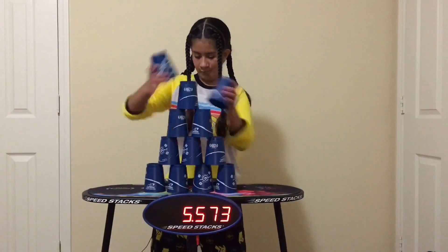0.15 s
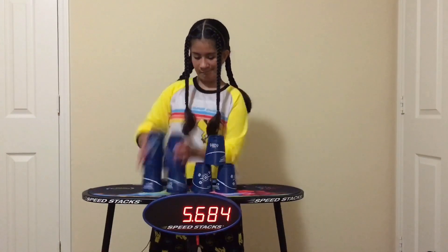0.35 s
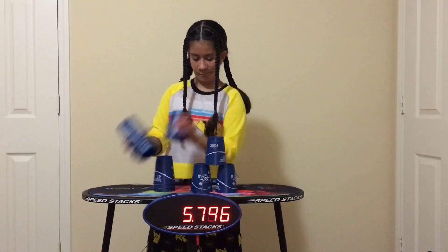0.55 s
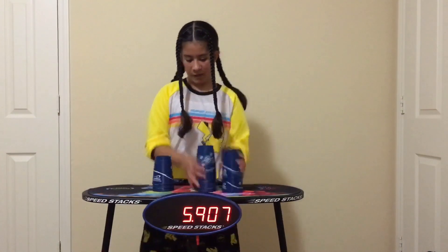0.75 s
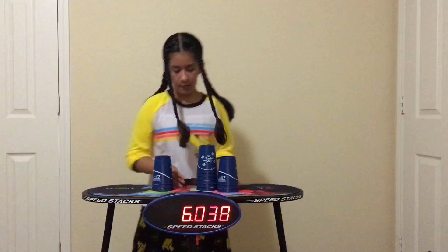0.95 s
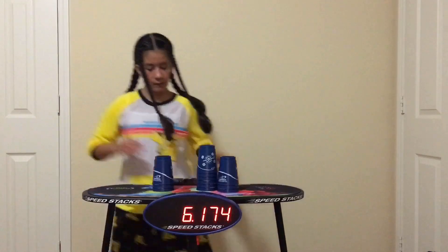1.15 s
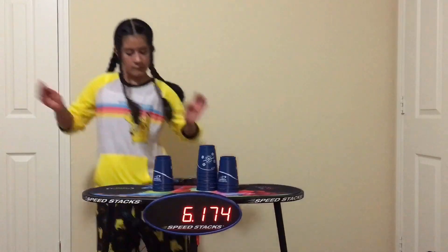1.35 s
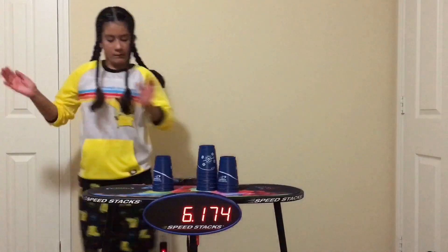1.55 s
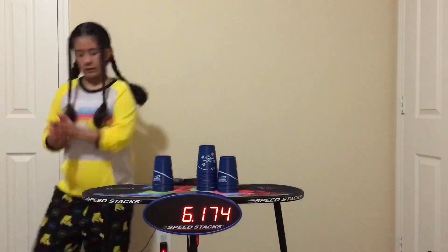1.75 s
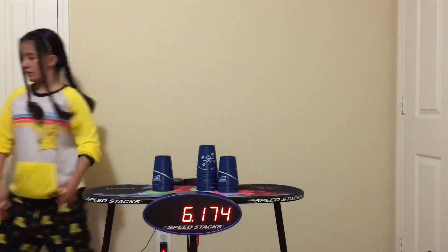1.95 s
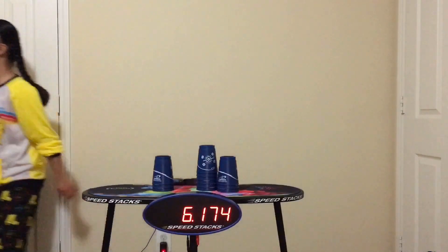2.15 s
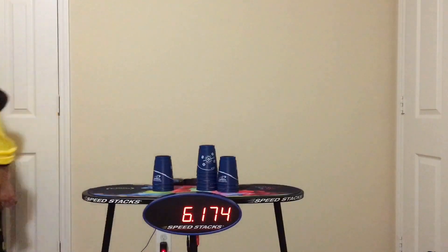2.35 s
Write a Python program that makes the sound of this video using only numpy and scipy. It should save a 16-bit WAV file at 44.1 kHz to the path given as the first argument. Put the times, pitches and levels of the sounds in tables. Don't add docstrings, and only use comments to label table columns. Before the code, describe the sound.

Fast hollow clatter of plastic cups in two short bursts, followed by a single echoing handclap

```python
import sys
import numpy as np
from scipy import signal
from scipy.fft import rfft, irfft, next_fast_len
from scipy.io import wavfile
from scipy.ndimage import uniform_filter1d

SR = 44100
rng = np.random.default_rng(int(sys.argv[2]) if len(sys.argv) > 2 else 0)


def master_out(mix):
    frames = np.transpose(np.atleast_2d(mix))
    ceiling = np.clip(frames, -1, 1)
    pcm = np.round(ceiling * 32767).astype(np.int16)
    wavfile.write(sys.argv[1], SR, pcm)


def gain_from_decibels(decibels):
    exponent = np.asarray(decibels, float) / 20
    return 10 ** exponent


N = 105840


def unit(x):
    return x / np.sqrt(np.mean(x ** 2) + 1e-20)


def along(points, hz):
    f, v = np.transpose(points)
    return np.interp(np.log(hz + 1), np.log(f + 1), v)


def gain_curve(rows):
    s, db = np.transpose(rows)
    return gain_from_decibels(np.interp(np.arange(N) / SR, s, db, left=-200, right=-200))


def filtered(x, response):
    m = next_fast_len(N + SR // 2)
    return irfft(rfft(x, m) * response(np.fft.rfftfreq(m, 1 / SR)), m)[:N]


def coloured(x, spectrum):
    cepstrum = irfft(np.log(gain_from_decibels(along(spectrum, np.fft.rfftfreq(4096, 1 / SR))) + 1e-6))
    cepstrum[1:2048] *= 2
    cepstrum[2049:] = 0
    h = irfft(np.exp(rfft(cepstrum)))
    return signal.fftconvolve(x, h / np.linalg.norm(h))[:N]


def resonant(x, peaks):
    def response(f):
        total = 0
        for k, (centre, width, db) in enumerate(peaks):
            total = total + (-1) ** k * gain_from_decibels(db) * 1j * f * width / (centre ** 2 - f * f + 1j * f * width)
        return total
    return filtered(x, response)


def room(x, t60s, stretch=1):
    out, step = np.zeros(N + 2 * SR), SR // 10
    for a in range(0, N, step):
        block = x[a:a + step]
        hz, t, z = signal.stft(rng.standard_normal(SR * 3 // 2), SR, nperseg=256)
        if np.any(block ** 2 > 1e-10):
            decay = gain_from_decibels(-60 * t / (stretch * along(t60s, hz)[:, None]))
            tail = signal.istft(z * decay, SR, nperseg=256)[1]
            y = signal.fftconvolve(block, tail / np.linalg.norm(tail))
            out[a + 50:][:len(y)] += y
    return out[:N]


# (frequency [Hz], level [dB])
HUSH_SPECTRUM = [(15, -45), (25, -20), (59, -7.5), (140, -16), (164, -11.5), (482, -22), (523, -29),
                 (598, -23), (15500, -42.5)]


def hush():
    return gain_from_decibels(-65.5) * coloured(rng.standard_normal(N), HUSH_SPECTRUM)


# (frequency [Hz], level [dB])
HUM_SPECTRUM = [(25, -13.5), (60, -4), (200, -23), (400, -5.5), (840, -2), (1500, -22.5), (4000, -23),
                (11000, -47)]


def hum():
    return gain_from_decibels(-54.5) * coloured(rng.standard_normal(N), HUM_SPECTRUM)


# (frequency [Hz], level [dB])
EARLIER_SPECTRUM = [(60, -16), (175, -3.5), (288, -10), (600, -8), (750, 3), (950, -13.5), (1500, -27),
                    (2100, -17.5), (11000, -39.5)]


def earlier_knocks():
    start_db, fall_db_per_s = -47.5, -49.5
    fall = gain_from_decibels(start_db + fall_db_per_s * np.arange(N) / SR)
    return fall * coloured(rng.standard_normal(N), EARLIER_SPECTRUM)


# (frequency [Hz], width [Hz], level [dB])
LENS_PEAKS = [(6460, 700, 5), (8800, 2800, -9)]
# (time [s], level [dB])
TICK_DRIFT = [
    (1.59, 0),
    (2.06, 4),
    (2.14, 0.5),
    (2.4, -2),
]


def lens_motor():
    start_s, gap_s, echo_s, t60_s, tick_db = 1.5995, .04995, .004, .006, -54
    x, t = np.zeros(N + SR), np.arange(SR // 100) / SR
    for s in np.arange(start_s, N / SR, gap_s):
        for lag_s in (0, echo_s):
            level = gain_from_decibels(tick_db + rng.normal(0, 1) - 60 * t / t60_s)
            x[round((s + lag_s) * SR):][:len(t)] += level * rng.standard_normal(len(t))
    return resonant(x[:N] * gain_curve(TICK_DRIFT), LENS_PEAKS)


# (time [s], level [dB])
RUSTLE_LEVEL = [
    (1.575, -64),
    (1.6, -59),
    (1.65, -58),
    (1.68, -62.5),
    (1.75, -59),
]
# (frequency [Hz], level [dB])
CLOTH_SPECTRUM = [(120, -34), (200, -24), (400, -7), (900, -0.5), (1200, -0.5), (1510, 1.5), (1950, -2.5),
                  (2400, -7.5), (15000, -33)]


def cloth():
    flutter = gain_from_decibels(1.2 * unit(uniform_filter1d(rng.standard_normal(N), 300)))
    friction = coloured(unit(flutter * rng.standard_normal(N)), CLOTH_SPECTRUM)
    return gain_from_decibels(2.5) * uniform_filter1d(gain_curve(RUSTLE_LEVEL), 900) * friction


# (delay [s], level [dB])
WALL_ECHOES = [
    (.0046, 1.5),
    (.016, -12),
    (.025, -11),
]


def walls(x):
    corner_hz = 6034
    echoes = sum(gain_from_decibels(db) * np.pad(x, (round(s * SR), 0))[:N] for s, db in WALL_ECHOES)
    return x + filtered(echoes, lambda hz: 1 / (1 + 1j * hz / corner_hz))


# (frequency [Hz], level [dB])
PALM_SPECTRUM = [(100, -14), (1200, -9), (2400, -6), (3100, -6.5), (4600, -5), (5200, -13.5), (9000, -16),
                 (10500, -24.5), (12000, -20), (16000, -22)]
# (frequency [Hz], width [Hz], level [dB])
PALM_AIR = [(2440, 990, -6), (3765, 650, 4), (4317, 590, -4.5)]
# (frequency [Hz], t60 [s])
CLAP_DECAY = [(150, 0.27), (400, 0.38), (1500, 0.46), (2700, 0.38), (3200, 0.63), (4600, 0.48),
              (5300, 0.46), (12000, 0.26)]
# (frequency [Hz], t60 [s])
CLAP_LATE_DECAY = [(600, 0.46), (1400, 1.65), (2700, 0.59), (3300, 1.06), (4500, 0.94), (5200, 0.55)]


def clap():
    clap_s, clap_db, brush_s, brush_db = 1.7633, -2.5, 0.0031, -37
    slap_db, pop_db, near_db, room_db, late_db = -4.5, 7, 3.5, 4.5, -12.5
    x, i, lead = np.zeros(N), round(clap_s * SR), round(brush_s * SR)
    x[i - lead:i] = gain_from_decibels(brush_db) * rng.standard_normal(lead) * np.linspace(0, 1, lead) ** 2
    x[i] = gain_from_decibels(clap_db)
    x = coloured(x, PALM_SPECTRUM)
    pop = gain_from_decibels(slap_db) * x + gain_from_decibels(pop_db) * resonant(x, PALM_AIR)
    near = gain_from_decibels(near_db) * room(x, CLAP_DECAY, 0.18)
    diffuse = gain_from_decibels(room_db) * room(x, CLAP_DECAY)
    late = gain_from_decibels(late_db) * room(pop, CLAP_LATE_DECAY)
    return walls(pop) + near + diffuse + late


def second_take():
    return clap() + cloth() + lens_motor() + hush()


def chatter(size):
    swing_db, swing_s = 3, .004
    width = round(swing_s * SR)
    smooth = uniform_filter1d(uniform_filter1d(rng.standard_normal(size), width), width)
    return gain_from_decibels(swing_db * unit(smooth))


def dying_notes(rows, swell_s):
    x, t = np.zeros(N), np.arange(SR // 2) / SR
    for s, db, hz, t60_s in rows:
        envelope = gain_from_decibels(db - 60 * t / t60_s) * (1 - np.exp(-t / swell_s)) * chatter(len(t))
        x[round(s * SR):][:len(t)] += envelope * np.sin(2 * np.pi * hz * t)
    return x


# (time [s], level [dB], frequency [Hz], t60 [s])
NEST_NOTES = [(.245, -20.5, 381, 0.11), (.317, -15, 520, 0.077), (.322, -13.5, 365, 0.081),
              (.346, -11.5, 385, 0.087), (.3768, -15, 367, 0.072), (.362, -15, 420, 0.051),
              (.384, -13.5, 348.4, 0.068), (.41, -11.5, 367.7, .08), (.42, -11.5, 418.4, .07),
              (.44, -30, 236, .3), (.446, -16.5, 256, 0.074), (.452, -12.5, 398, .1),
              (.465, -16.5, 380, 0.061), (.774, -12, 320, 0.031), (.785, -8, 318, 0.13),
              (.809, -9.5, 329, 0.095), (.82, -12, 447, 0.028), (.831, -17.5, 520, 0.08)]


def nest_columns():
    return dying_notes(NEST_NOTES, swell_s=0.0014)


# (time [s], level [dB], frequency [Hz], t60 [s])
RIM_NOTES = [(.2435, -17.5, 783, 0.11), (.2435, -25, 2120, .05), (.249, -24.5, 1980, 0.04),
             (.27, -23.5, 758, 0.067), (.272, -25.5, 3480, 0.1), (.284, -25.5, 1980, 0.032),
             (.2995, -19, 2020, 0.046), (.3152, -15, 2006, .06), (.3152, -17.5, 1520, 0.053),
             (.3152, -20.5, 2590, .04), (.318, -11.5, 1090, 0.11), (.318, -14.5, 1260, .07),
             (.3436, -19, 2230, 0.043), (.3593, -17.5, 850, 0.071), (.3593, -20.5, 2200, .025),
             (.3677, -17, 799, .08), (.3677, -14.5, 1083, .05), (.3677, -18, 1347, 0.055),
             (.3768, -12, 1265, .06), (.3768, -18, 2126, .05), (.3768, -17, 2710, 0.067),
             (.3845, -16, 831, .07), (.3845, -15, 509, .06), (.395, -18.5, 936, 0.06),
             (.4095, -16, 1171, .08), (.43, -19, 3170, .05), (.439, -23, 4907, 0.032),
             (.7075, -26, 3974, .03), (.808, -22, 4460, 0.027), (.7721, -22, 3260, .03),
             (.439, -21, 2182, .06), (.439, -18.5, 2386, 0.053), (.446, -15.5, 743, .05),
             (.446, -14.5, 952, 0.062), (.7277, -15, 701, 0.17), (.7277, -12, 1065, 0.071),
             (.7277, -22.5, 1840, .05), (.736, -15, 1159, .1), (.736, -14.5, 1414, 0.062),
             (.7554, -13.5, 1097, 0.084), (.7721, -13, 822, 0.074), (.7721, -12, 1182, 0.075),
             (.7721, -19, 1960, 0.088), (.783, -14, 727, 0.064), (.783, -22.5, 2121, 0.04),
             (.797, -12, 1050, 0.06), (.808, -12, 1150, .07), (.853, -21, 1137, .07)]


def ringing_rims():
    return dying_notes(RIM_NOTES, swell_s=.0008)


# (time [s], level [dB])
SLIDE_RUNS = [
    [(.225, -32), (.25, -27), (.31, -23.5), (.4, -22), (.47, -29.5)],
    [(.695, -32), (.73, -24.5), (.79, -24.5), (.84, -29)],
]


def slide_rattle():
    taps_per_s, spread_db, rattle_db = 1500, 1.5, -3.5
    chance, strength = rng.random((2, N))
    level = gain_from_decibels(-spread_db * np.log(strength + 0.023))
    taps = unit((chance < taps_per_s / SR) * level * rng.standard_normal(N))
    return gain_from_decibels(rattle_db) * taps * sum(gain_curve(rows) for rows in SLIDE_RUNS)


# (time [s], crack level [dB], table thump level [dB])
CUP_KNOCKS = [(0.2244, -23, -30), (.2428, -12.5, -29), (0.2614, -18, -22.5), (0.2994, -15.5, -20),
              (0.3156, -10.5, -18.5), (0.3202, -9, -16.5), (0.3437, -11, -13), (0.3595, -8.5, -17),
              (0.3678, -15, -18), (.3768, -8, -16), (0.3844, -10.5, -14.5), (.4095, -17.5, -17),
              (.4300, -7.5, -17), (.439, -11, -10.5), (0.4508, -14.5, -17), (0.6936, -21, -32.5),
              (0.7077, -17, -26), (0.7278, -16, -24.5), (0.733, -13, -15.5), (.7477, -10, -24),
              (0.7555, -10, -18.5), (.7721, -5.5, -8.5), (0.7841, -10.5, -11), (.808, -4.5, -10.5),
              (0.8172, -11.5, -11)]
# (frequency [Hz], level [dB])
CRACK_SPECTRUM = [(290, -30.5), (500, -3), (639, -9), (786, -6.5), (1200, -6.5), (1500, -10), (2160, -10),
                  (5000, -17), (11000, -26.5), (14300, -62.5), (22000, -120)]
# (frequency [Hz], width [Hz], level [dB])
SHELL_PEAKS = [(830, 200, 4), (1070, 47, -7.5), (1930, 97, -7), (2880, 15, -10.5), (3190, 390, -6),
               (3600, 39, -14.5), (4900, 71, -23.5), (5630, 88, -13)]
# (frequency [Hz], width [Hz], level [dB])
TABLE_PEAKS = [(74, 19, -12.5), (116.3, 51, -9.5), (173, 70, -7), (236, 26, -5), (326, 51, 0),
               (385, 55, -0.5), (427, 32, 0.5), (520, 70, -7)]


def cups():
    crack_t60_s, thump_t60_s, shove_s, grit = .012, 0.0074, 0.0014, 0.74
    crack_db, shell_db, thump_gain_db = -1.5, -1.5, -3.5 + 16.5
    crack, push, t = np.zeros(N), np.zeros(N), np.arange(SR // 10) / SR
    for s, db, thump_db in CUP_KNOCKS:
        i = round(s * SR)
        a, b = rng.standard_normal((2, len(t)))
        crack[i:][:len(t)] += gain_from_decibels(db - 60 * t / crack_t60_s) * grit * a
        crack[i] += gain_from_decibels(db + 5)
        push[i:][:len(t)] += gain_from_decibels(thump_db - 60 * t / thump_t60_s) * np.abs(b) * (1 - t / shove_s)
    crack += slide_rattle()
    snap = gain_from_decibels(crack_db) * coloured(crack, CRACK_SPECTRUM)
    shell = gain_from_decibels(shell_db) * resonant(crack, SHELL_PEAKS)
    return snap + shell + gain_from_decibels(thump_gain_db) * resonant(push, TABLE_PEAKS)


# (frequency [Hz], t60 [s])
ROOM_DECAY = [(80, 0.52), (250, 0.73), (700, 0.59), (2000, 0.69), (3500, 0.59), (6000, 0.52), (10000, 0.31)]
# (frequency [Hz], t60 [s])
LATE_DECAY = [(150, 0.85), (300, 1.2), (500, 1.9), (1200, 1.87), (1600, 1), (2100, 2), (4000, 1.2),
              (8000, 0.68)]


def cup_room(dry):
    near_db, room_db, late_db = -6, 1.5, -10.5
    near = gain_from_decibels(near_db) * room(dry, ROOM_DECAY, stretch=.1)
    diffuse = gain_from_decibels(room_db) * room(dry, ROOM_DECAY)
    return near + diffuse + gain_from_decibels(late_db) * room(dry, LATE_DECAY)


# (time [s], level [dB])
GAIN_DRIFT = [(0, 1.3), (.5, -.5), (.68, -1), (.72, 1.3), (1, -0.66), (1.15, 1), (1.3, 2), (1.45, -0.5),
              (1.57, -2)]


def first_take():
    direct_db, nest_dry_db, nest_wet_db, rim_dry_db, rim_wet_db = 2, -3, -7, -5, -8
    bass_cut_hz, ceiling, dull_hz = 8.9, .9, 11300
    low, rims = nest_columns(), ringing_rims()
    dry = cups() + gain_from_decibels(nest_wet_db) * low + gain_from_decibels(rim_wet_db) * rims
    dry = filtered(dry, lambda hz: (1j * hz / (1j * hz + bass_cut_hz)) ** 2)
    x = gain_from_decibels(direct_db) * dry + gain_from_decibels(nest_dry_db) * low + gain_from_decibels(rim_dry_db) * rims
    x = x + cup_room(dry) + earlier_knocks() + hum()
    x = x * gain_curve(GAIN_DRIFT + [(N / SR, 0)])
    x = x / (1 + np.abs(x / ceiling) ** 6) ** (1 / 6)
    return filtered(x, lambda hz: np.clip((dull_hz + 150 - hz) / 300, 0, 1))


def scene():
    cut_s, fade_s = 1.573, 0.0097
    t = np.arange(N) / SR
    first = np.clip((cut_s - t) * 1000, 0, 1) * first_take()
    second = np.clip((t - cut_s) / fade_s, 0, 1) * second_take()
    return (first + second)[None]


def top_cut(x):
    return signal.sosfilt(signal.butter(12, 16480, fs=SR, output="sos"), x)


def record(dry):
    top_hz = 15750
    mix = filtered(dry[0], lambda hz: np.clip((top_hz + 300 - hz) / 400, 0, 1))[None]
    return top_cut(mix)


dry = scene()
out = record(dry)
master_out(out)
```